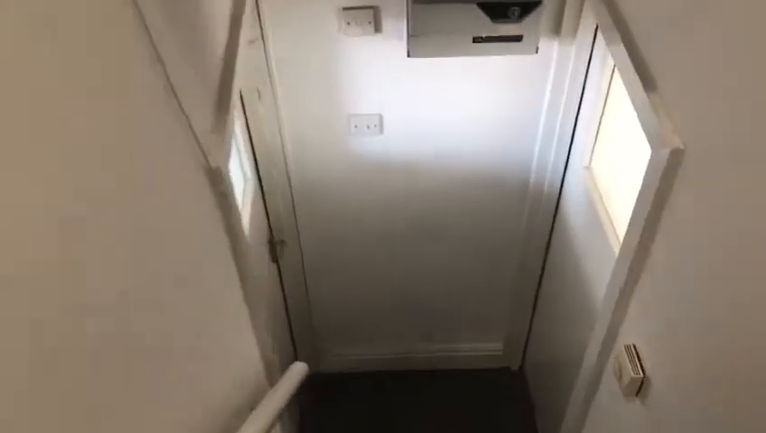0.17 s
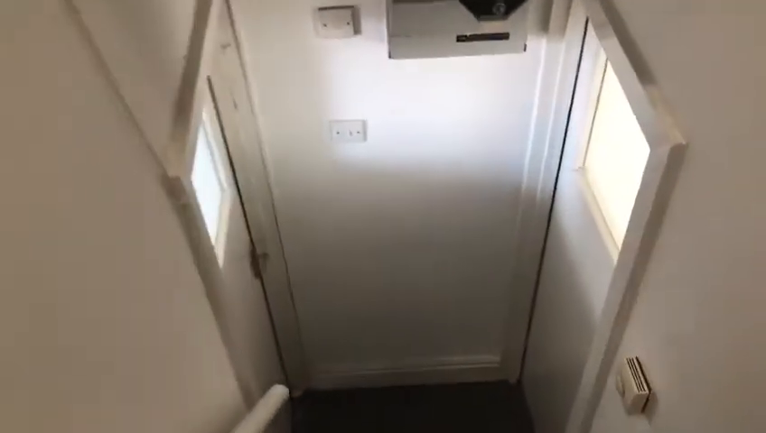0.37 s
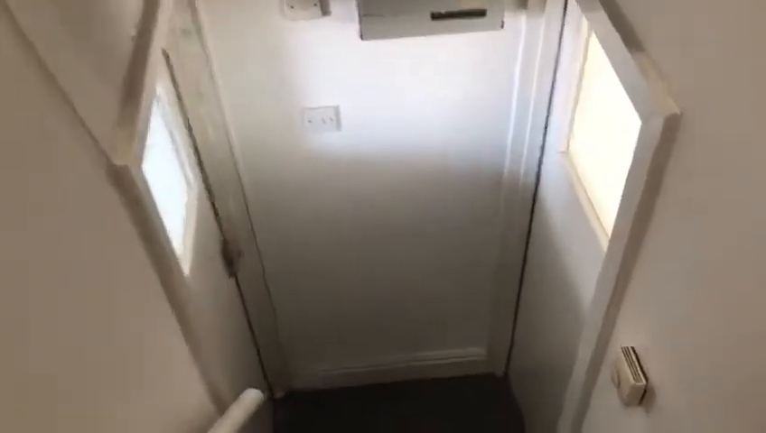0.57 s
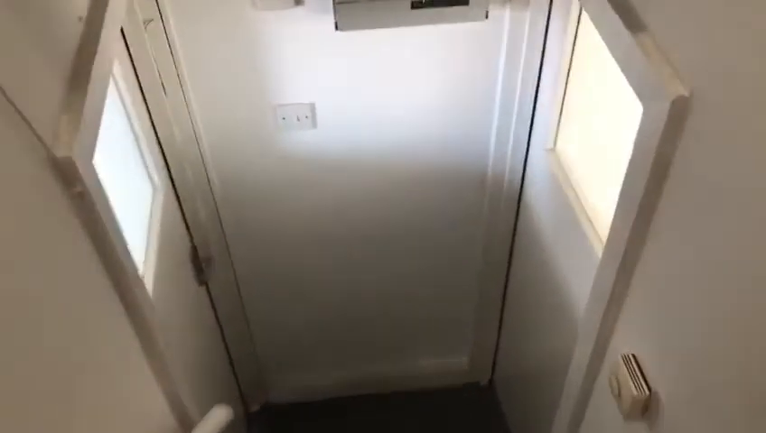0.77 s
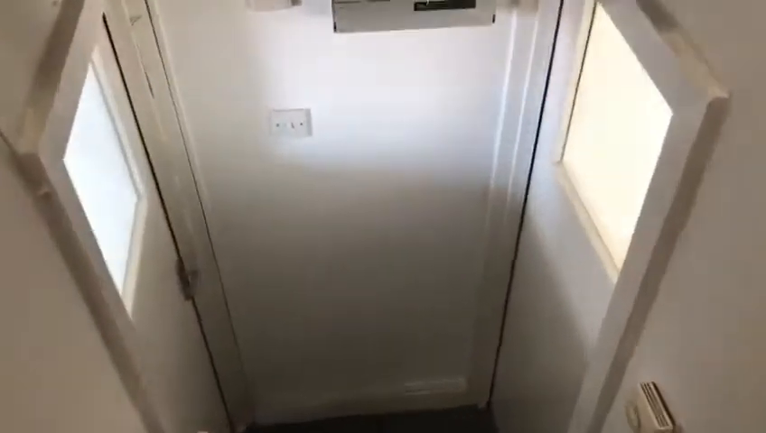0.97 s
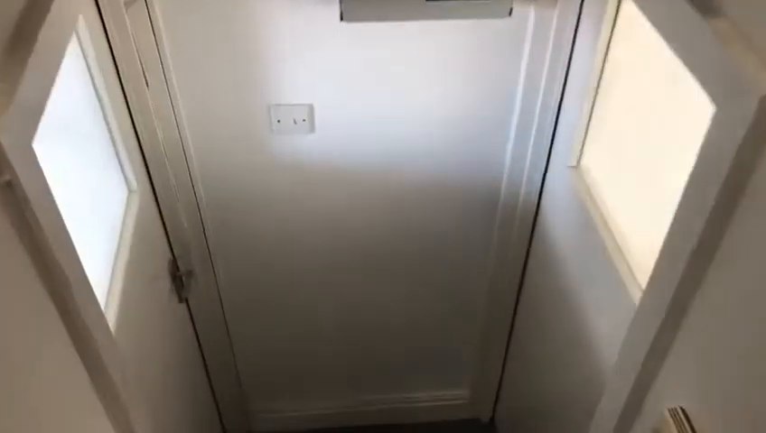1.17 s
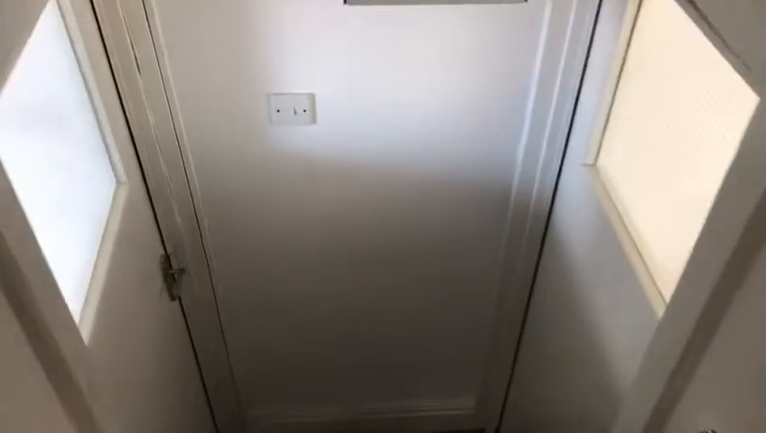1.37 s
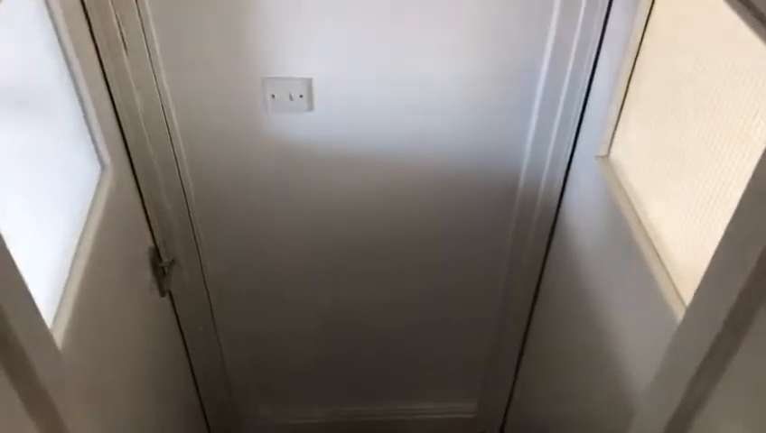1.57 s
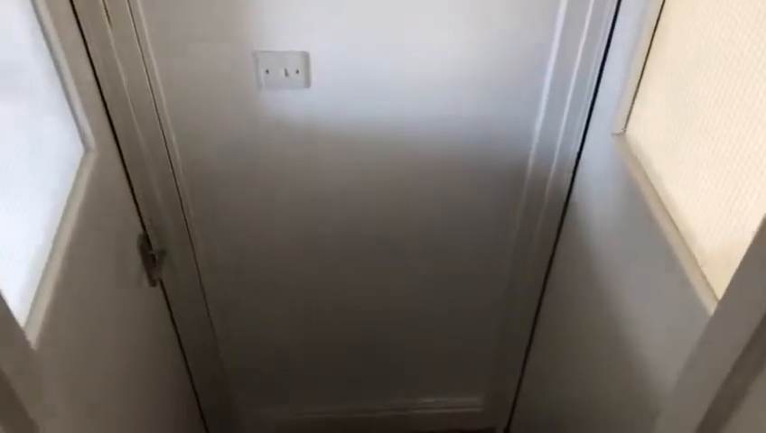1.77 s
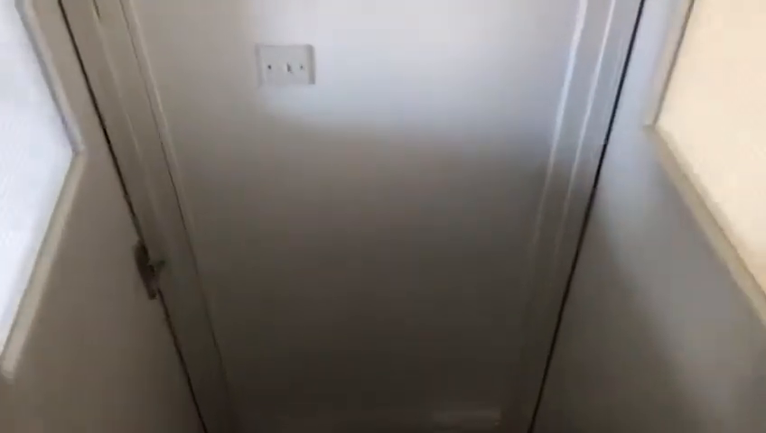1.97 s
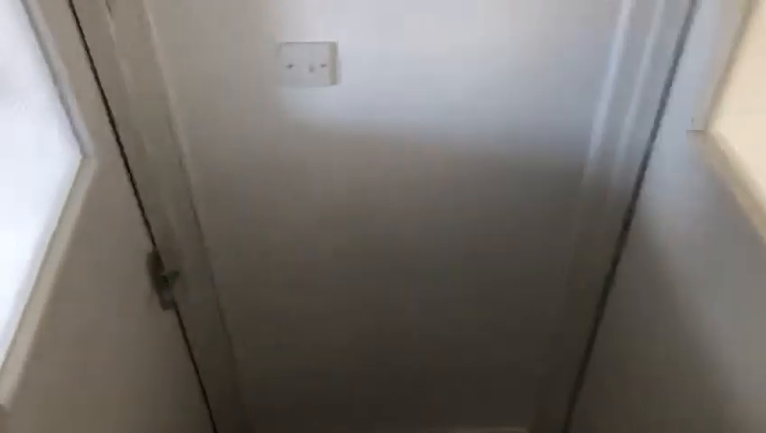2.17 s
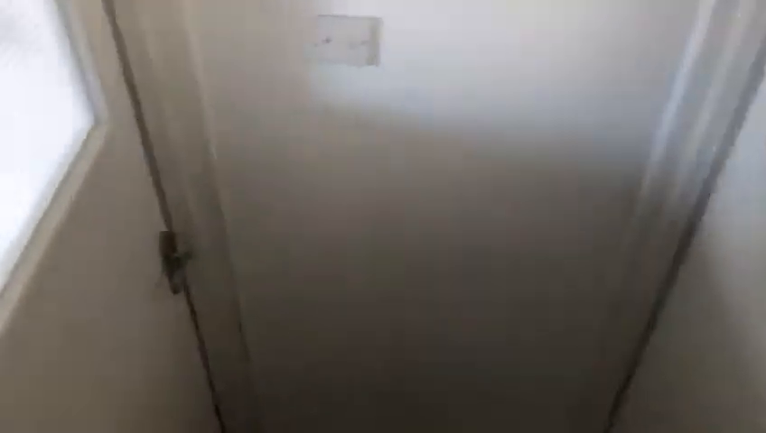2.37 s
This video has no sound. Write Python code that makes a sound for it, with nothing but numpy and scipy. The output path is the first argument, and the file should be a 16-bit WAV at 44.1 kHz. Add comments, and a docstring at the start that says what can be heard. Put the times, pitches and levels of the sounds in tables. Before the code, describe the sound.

Someone walks down carpeted wooden stairs indoors, dull hollow thuds at about two steps a second

```python
"""The dying ring of an earlier footfall opens the scene; someone walks down a narrow carpeted staircase,
about two steps a second. Each footfall thuds on a wooden tread as decaying modes, rings the staircase and
makes it sway. Soles and boards knock and snap in bursts of coloured noise; a board sounds hollow, something
rattles. Shoes scuff the carpet in clumped noise, a hand hisses along the rail, over the quiet air of the house.
The stairwell answers thuds, knocks and scuffs with brief noise tails that lose their treble first."""
import sys
import numpy as np
from scipy import signal
from scipy.fft import rfft, irfft
from scipy.io import wavfile
from scipy.ndimage import uniform_filter1d

SR = 44100
rng = np.random.default_rng(int(sys.argv[2]) if len(sys.argv) > 2 else 0)


def store_pcm(level_fs):
    """Save levels as 16-bit WAV."""
    pcm = np.round(np.clip(level_fs, -1, 1) * 32767).astype(np.int16)
    wavfile.write(sys.argv[1], SR, np.atleast_2d(pcm).T)


N = 106325
HZ = np.fft.rfftfreq(N, 1 / SR)
T = np.arange(SR) / SR  # one second, the longest any struck sound lasts

# Heel, toe and push-off on the treads, after the dying ring of an earlier footfall at time 0;
# levels before THUD_TRIM_DB, shares relative to the blow:
# (time [s], level [dB], tread pitch [Hz], ring t60 [s], staircase share [dB], stairwell share [dB])
THUDS = [(0.0, -45, 199.7, 0.36, 2.5, -2), (0.136, -28.5, 231.5, 0.049, -1.5, 0.5),
         (0.146, -25, 218, 0.047, -5, -1.5), (0.195, -30, 174, 0.11, 2.5, 0),
         (0.205, -26, 173, 0.077, 2, 1), (0.265, -10, 224.5, 0.058, -5, -16),
         (0.276, -10.5, 214.2, 0.097, -11, -13.5), (0.438, -46, 230, 0.12, -2, 9),
         (0.505, -34.5, 211.4, 0.11, 2.5, -4), (0.673, -47, 168, 0.13, 0, -8),
         (0.748, -19.5, 203, 0.038, -3.5, 0.5), (0.757, -30, 218, .06, -3, -15),
         (0.82, -29, 163, 0.061, -1.5, -9), (0.889, -36, 210, 0.17, 1.5, -0.5),
         (0.964, -43, 254, 0.086, 6, 7), (1.040, -37.5, 212, 0.12, 3, -6.5),
         (1.222, -34, 150, 0.097, -1, -8), (1.233, -33.5, 147.6, 0.15, 0, -17),
         (1.301, -31.5, 239, 0.099, -8, -9), (1.326, -31, 150, 0.15, 1, -1),
         (1.367, -19.5, 280, 0.034, -5, -7), (1.3761, -16.5, 220, 0.055, -5.5, -15),
         (1.409, -25.5, 230, 0.075, -4, -4), (1.438, -31.5, 246, 0.1, -7, -5),
         (1.791, -25, 241.3, 0.13, 5, -3), (1.801, -21, 227, 0.036, -10, -12),
         (1.842, -28, 158.3, 0.26, -25, -14), (1.881, -34.5, 218, 0.039, 11.5, 13.5),
         (1.909, -23.5, 179, 0.038, -3, -21), (1.968, -17, 219, 0.056, -10.5, -10),
         (1.981, -24, 262, 0.1, -12, -3), (2.059, -30.5, 287, 0.13, -9, -1.5),
         (2.169, -21.5, 237, 0.082, -5, -10.5), (2.197, -30.5, 210, 0.17, -9, -6),
         (2.379, -32.5, 199, 0.12, -12, -2.5)]
# What the staircase rings with at every thud: (frequency [Hz], level [dB], t60 [s])
STAIR_MODES = [(99.4, -25.5, 0.27), (148.6, -11.5, 0.33), (226.3, -24, 0.5), (255, -21, 0.43),
               (301.5, -24, 0.3), (605, -38.5, 0.1), (662, -37, 0.2)]
# Colour of the thuds' echo in the stairwell: (frequency [Hz], level [dB])
THUD_ECHO = [(60, -23), (115, -11.5), (150, 2.5), (230, -5), (300, -4), (380, -16), (520, -19), (750, -22),
             (1200, -34), (3000, -48)]
THUD_TRIM_DB, THUD_RISE_S = 2, 0.0029
UPPER_RATIO, UPPER_DB = 1.385, -19.5  # second bending mode of a tread, relative to its first
TREAD_LOW_HZ = 106.5  # a tread radiates little below this

# Knocks and snaps of soles and boards, levels before KNOCK_TRIM_DB:
# (time [s], wood [dB], clack [dB], snap [dB], fizz [dB], rise [s], t60 [s])
KNOCKS = [(0.135, -54.5, -56, -72, -80, 0.0014, 0.032), (0.149, -70, -52, -60, -82, 0.0013, 0.039),
          (0.184, -47.5, -52, -59, -72, 0.0023, 0.11), (0.235, -40.5, -48.5, -49, -52, 0.0013, 0.039),
          (0.265, -29.5, -47, -73, -76, 0.0015, 0.033), (0.440, -55, -66, -81, -74, .001, 0.039),
          (0.489, -45, -51, -66, -69, 0.0017, 0.064), (0.734, -37.5, -49, -58, -68, 0.00067, 0.047),
          (0.742, -38.5, -42, -48, -55, 0.00067, 0.077), (0.804, -39.5, -49, -64, -73, 0.00072, 0.071),
          (0.887, -41.5, -59.5, -80, -87, 0.0014, 0.12), (0.961, -51, -57.5, -68, -75, 0.00076, 0.057),
          (1.030, -51, -60, -62.5, -71, 0.0026, 0.093), (1.08, -55, -62, -60.5, -66.5, 0.00092, 0.061),
          (1.12, -60.5, -67, -65, -69, 0.002, 0.072), (1.219, -64, -62, -69, -78, 0.0037, 0.25),
          (1.259, -42, -46, -55, -64, 0.0012, 0.067), (1.311, -46, -47, -58, -78, 0.0025, .08),
          (1.36, -35, -41, -51.5, -69, 0.0021, 0.073), (1.404, -33.5, -38.5, -43, -49, 0.0036, 0.076),
          (1.493, -53, -56.5, -57.5, -62, 0.0014, 0.042), (1.693, -80, -62, -67, -74, 0.0016, 0.046),
          (1.7818, -65, -54, -30, -62, 0.00051, 0.006), (1.7888, -28.5, -30.5, -35, -60, 0.0017, 0.066),
          (1.829, -63, -60, -47, -50.5, 0.00088, 0.034), (1.868, -41.5, -46, -55.5, -67, 0.001, 0.13),
          (1.893, -33.5, -44, -49, -49.5, 0.0027, 0.074), (1.9367, -39, -41.5, -60, -58, 0.00081, .06),
          (1.968, -37, -40.5, -58, -65, .001, 0.076), (2.005, -49, -53, -60.5, -63, 0.0025, 0.24),
          (2.0548, -27.5, -29.5, -35, -37, .002, 0.048), (2.164, -35.5, -38, -45, -56, 0.00093, .055),
          (2.282, -55, -60.5, -65, -62, 0.003, 0.059), (2.385, -57, -49, -60, -62.5, 0.00061, 0.038)]
# Colours of the four knock ingredients, dull to bright: (frequency [Hz], level [dB])
WOOD_COLOUR = [(150, -18), (300, -6), (400, -1), (540, 0), (700, -2), (1000, -8), (1400, -17.5),
               (3000, -52)]
CLACK_COLOUR = [(600, -16), (1100, 0), (1400, 3.5), (1750, 3), (2400, 0), (3600, -6), (5500, -32)]
SNAP_COLOUR = [(2500, -7), (4200, 0.5), (5600, 0), (7000, -5.5), (8500, -20), (12000, -22)]
FIZZ_COLOUR = [(5500, -5), (8000, 0.5), (10000, -2), (12000, -16)]
KNOCK_TRIM_DB, KNOCK_ROOM_DB, KNOCK_GRIT_DB = 2, -2.5, 2

# Weight settling on the staircase: (time [s], level [dB])
LOADS = [(0.005, -53), (0.169, -34.5), (0.281, -37), (0.50, -45), (0.746, -42), (0.81, -38), (0.89, -47),
         (1.259, -38), (1.43, -39), (1.84, -41), (1.98, -39.5), (2.17, -41), (2.38, -39)]
# The swaying staircase: (frequency [Hz], level [dB], t60 [s])
SWAY_MODES = [(38.2, -4, 0.63), (63.1, -1, 0.47), (99.8, -1.5, 0.29)]
SWAY_RISE_S = 0.024
# Hollow knocks of a board: (time [s], level [dB])
HOLLOWS = [(0.888, -43), (1.793, -37.5), (2.166, -30.5), (2.289, -45)]
# The hollow board: (frequency [Hz], level [dB], t60 [s])
HOLLOW_MODES = [(435.8, -10, 0.46), (493, 2, 0.19), (573, -15, .25), (704, -14.5, 0.21)]
# Light rattles that ring on: (time [s], level [dB])
RATTLES = [(0.491, -61), (1.031, -58), (1.079, -61), (1.121, -62.5), (1.790, -55), (2.056, -45),
           (2.384, -55)]
# The rattling part: (frequency [Hz], level [dB], t60 [s])
RATTLE_MODES = [(1056, -8.5, 0.16), (1593, -1, 0.21), (1672, 6.5, 0.06), (1837, 3, 0.083),
                (2405, -8.5, 0.059), (2900, -8, 0.12), (2970, -12.5, 0.21)]

# Soles dragging over the pile: (time [s], length [s], level [dB], treble shelf [dB])
SCUFFS = [(0.187, .05, -48.5, -4), (0.221, 0.12, -50.5, -10), (0.282, 0.046, -63, 20),
          (0.484, 0.056, -54.5, -32), (0.815, 0.038, -50.5, 5), (1.264, 0.072, -44, -21),
          (1.392, 0.042, -43, 0.5), (1.87, .18, -44, -13)]
# Colour of the scuffs before the treble shelf: (frequency [Hz], level [dB])
SCUFF_COLOUR = [(100, -3), (350, -1), (700, -1), (1200, -5), (2500, -14.5), (6000, -18.5), (12000, -29)]
SCUFF_TREBLE_HZ = 3340  # half of the shelf's decibels are reached here
SCUFF_GRIT_DB, SCUFF_CLUMP_DB, CLUMP_S = 3, 3, 0.007

# Hand sliding along the rail: (time [s], length [s], hiss [dB], squeal [dB])
SLIDES = [(0, 0.21, -77, -76), (0.266, 0.26, -70, -89), (0.434, 0.45, -64.5, -69)]
# Colour of the hand's hiss: (frequency [Hz], level [dB])
HISS_COLOUR = [(1500, -3), (3500, -7), (5200, -6.5), (8000, -4.5), (10500, -5), (12000, -12.5)]
# Colour of the hand's squeal, a narrow peak: (frequency [Hz], level [dB])
SQUEAL_COLOUR = [(4000, -45), (4900, -8), (5200, 0), (5500, -8), (6500, -40)]

# How long the stairwell rings: (frequency [Hz], t60 [s])
STAIRWELL_T60 = [(100, 0.49), (260, 0.69), (700, 0.36), (1840, 0.21), (4850, 0.21), (12000, 0.091)]
# Colour of the quiet air of the house: (frequency [Hz], level [dB])
AIR_COLOUR = [(15, -53), (25, 1), (38, 14), (90, 7.5), (190, 5), (450, -2.5), (900, -6.5), (1600, -12.5),
              (3100, -17.5), (5000, -18.5), (9000, -23.5), (12000, -27)]
AIR_DB = -59
EDGE_HZ = 12050  # upper band limit of the whole mix


def amp(db):
    """Decibels to gain."""
    return 10 ** (np.asarray(db) / 20)


def unit(x):
    """Scales to rms 1."""
    return x / np.sqrt(np.mean(x ** 2) + 1e-20)


def read(points, hz):
    """Reads a table on a log-frequency axis."""
    f, value = np.transpose(points)
    return np.interp(np.log(hz + 1), np.log(f + 1), value)


def add(mix, s, sound):
    """Mixes a sound in at time s."""
    part = mix[max(round(s * SR), 0):][:len(sound)]
    part += sound[:len(part)]


def noise(spectrum, grit_db=0, extra_db=0):
    """Coloured noise of rms 1; grit makes it grainy from one millisecond to the next."""
    flutter = unit(uniform_filter1d(rng.standard_normal(N), size=44))
    grains = rng.standard_normal(N) * amp(grit_db * flutter)
    colour = amp(read(spectrum, HZ) + extra_db)
    return unit(irfft(rfft(grains) * colour, N))


def piece(x):
    """One second from a random place in a noise."""
    return np.roll(x, rng.integers(N))[:SR]


def strike(rise_s, t60):
    """Quick rise and exponential decay."""
    return (1 - np.exp(-(T / rise_s) ** 2)) * np.exp(-np.log(1000) * T / t60)


def stroke(length):
    """The swell and fade of a sliding contact."""
    return np.sin(np.linspace(0, np.pi, max(round(length * SR), 2)))


def ring(modes, rise_s):
    """A struck body: a sum of dying modes."""
    return sum(amp(db) * strike(rise_s, t60) * np.sin(2 * np.pi * hz * T) for hz, db, t60 in modes)


def play(events, modes, rise_s):
    """Rings one body at each event."""
    out, sound = np.zeros(N), ring(modes, rise_s)
    for s, db in events:
        add(out, s, amp(db) * sound)
    return out


def stairwell(sound, colour):
    """Dense reflections between close walls: the sound's energy returns as a coloured noise tail."""
    hz, t, z = signal.stft(colour, SR, nperseg=512)
    t60 = read(STAIRWELL_T60, hz)[:, None]
    # each band dies at its own rate, and long-ringing bands start lower
    fade = np.exp(-np.log(1000) * t / t60) / np.sqrt(t60)
    tail = signal.istft(z * fade, SR, nperseg=512)[1][:SR]
    tail = tail * np.minimum(T / 0.0087, 1)  # reflections build up over 8.7 ms
    return tail * np.linalg.norm(sound) / np.linalg.norm(tail)


def thuds():
    """A cushioned blow bends one tread, rings the whole staircase and echoes in the stairwell."""
    out = np.zeros(N)
    stairs = ring(STAIR_MODES, THUD_RISE_S)
    echo_colour = noise(THUD_ECHO)
    for s, db, hz, t60, stairs_db, room_db in THUDS:
        blow = ring([(hz, 0, t60), (hz * UPPER_RATIO, UPPER_DB, t60)], THUD_RISE_S)
        echo = stairwell(blow, piece(echo_colour))
        thud = blow + amp(stairs_db) * stairs + amp(room_db) * echo
        add(out, s, amp(db + THUD_TRIM_DB) * thud)
    low_cut = signal.butter(2, TREAD_LOW_HZ, "high", fs=SR, output="sos")
    return signal.sosfilt(low_cut, out)


def knocks():
    """Soles and boards strike in short gritty bursts, each its own mix of wood, clack, snap and fizz."""
    out = np.zeros(N)
    spectra = (WOOD_COLOUR, CLACK_COLOUR, SNAP_COLOUR, FIZZ_COLOUR)
    colours = np.array([noise(spectrum, grit_db=KNOCK_GRIT_DB) for spectrum in spectra])
    for s, wood_db, clack_db, snap_db, fizz_db, rise_s, t60 in KNOCKS:
        colour = amp([wood_db, clack_db, snap_db, fizz_db]) @ colours
        burst = piece(colour) * strike(rise_s, t60)
        add(out, s, burst + amp(KNOCK_ROOM_DB) * stairwell(burst, piece(colour)))
    return amp(KNOCK_TRIM_DB) * out


def sway():
    """The staircase booms in a few low, slow-rising modes as it takes the weight."""
    return play(LOADS, SWAY_MODES, SWAY_RISE_S)


def hollow_board():
    """A board sounds hollow, ringing in a cluster of mid-range modes."""
    return play(HOLLOWS, HOLLOW_MODES, rise_s=0.0076)


def rattles():
    """Something loose rings on lightly in higher modes."""
    return play(RATTLES, RATTLE_MODES, rise_s=0.002)


def scuffs():
    """Friction of soles on the carpet, in clumps of grains."""
    out = np.zeros(N)
    shelf = HZ ** 2 / (HZ ** 2 + SCUFF_TREBLE_HZ ** 2)
    for s, length, db, treble_db in SCUFFS:
        swell = amp(db) * stroke(length)
        colour = noise(SCUFF_COLOUR, grit_db=SCUFF_GRIT_DB, extra_db=treble_db * shelf)
        flutter = unit(uniform_filter1d(rng.standard_normal(len(swell)), round(CLUMP_S * SR)))
        clumps = amp(SCUFF_CLUMP_DB * flutter)
        rub = swell * unit(clumps * colour[:len(swell)])
        add(out, s, rub)
        # the tail starts at the height of the swell
        add(out, s + length / 2, amp(-2) * stairwell(rub, piece(colour)))
    return out


def slides():
    """Friction of the hand on the rail: a thin hiss with a faint squeal."""
    hiss, squeal = np.zeros((2, N))
    for s, length, hiss_db, squeal_db in SLIDES:
        add(hiss, s, amp(hiss_db) * stroke(length))
        add(squeal, s, amp(squeal_db) * stroke(length))
    return hiss * noise(HISS_COLOUR, grit_db=1.5) + squeal * noise(SQUEAL_COLOUR)


def air():
    """The quiet air of the house: steady noise weighted to the bass."""
    return amp(AIR_DB) * noise(AIR_COLOUR)


def scene():
    """The steps and the woodwork over the quiet air, as one channel."""
    woodwork = sway() + hollow_board() + rattles()
    return (thuds() + knocks() + woodwork + scuffs() + slides() + air())[None]


def record(dry):
    """A steep linear-phase low-pass limits the band."""
    low_pass = signal.firwin(511, EDGE_HZ, window=("kaiser", 9), fs=SR)
    return signal.oaconvolve(dry, low_pass[None], "same")


dry = scene()
out = record(dry)
store_pcm(out)
```